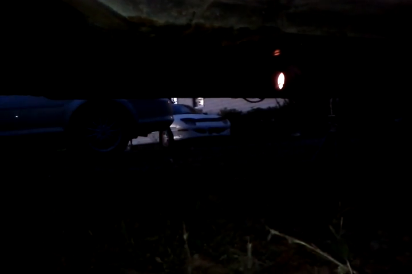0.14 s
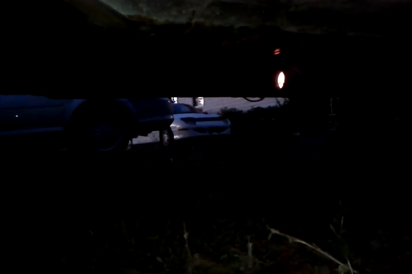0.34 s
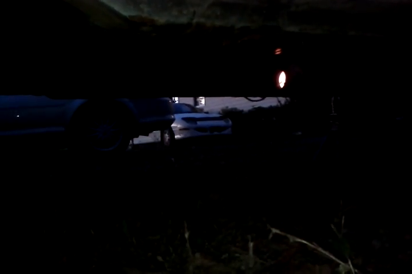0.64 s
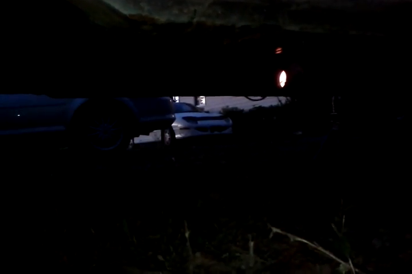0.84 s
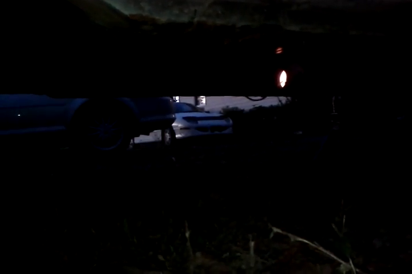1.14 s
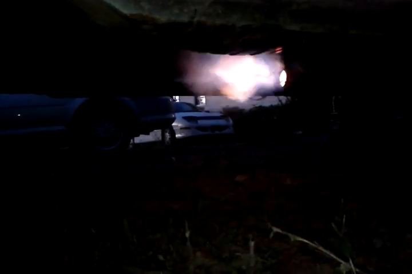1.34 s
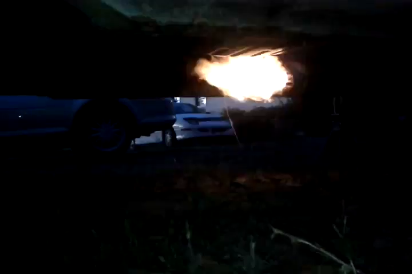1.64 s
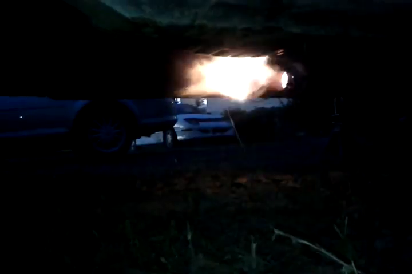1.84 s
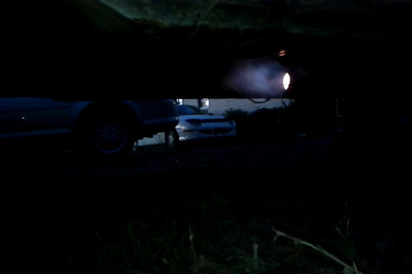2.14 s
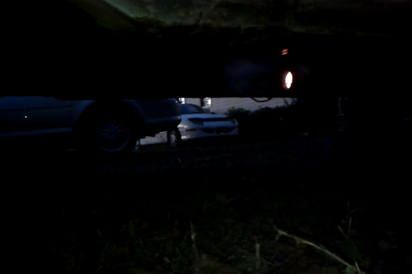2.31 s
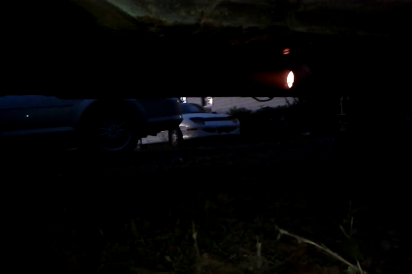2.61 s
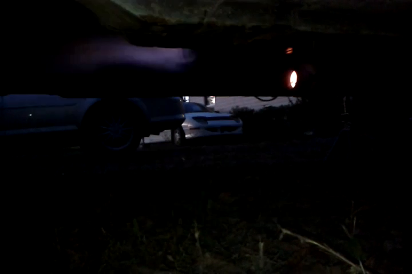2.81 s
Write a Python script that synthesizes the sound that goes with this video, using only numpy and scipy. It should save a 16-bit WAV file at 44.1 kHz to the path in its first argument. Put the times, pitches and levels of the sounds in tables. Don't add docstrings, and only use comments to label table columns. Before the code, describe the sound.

Loud car exhaust close up: loping idle, then a harsh climbing roar with sharp flame crackles.

```python
import sys
import numpy as np
from scipy import signal
from scipy.io import wavfile
from scipy.ndimage import uniform_filter1d

SR = 44100
rng = np.random.default_rng(int(sys.argv[2]) if len(sys.argv) > 2 else 0)


def store_wav(level_fs):
    pcm = np.round(np.clip(np.atleast_2d(level_fs), -1, 1) * 32767)
    wavfile.write(sys.argv[1], SR, pcm.T.astype(np.int16))


def amplitude_ratio(level_db):
    exponent = np.asarray(level_db, float) / 20
    return 10 ** exponent


N = 130977

# t/s, firing rate f/Hz
FIRING_RATE = [(0, 73.7), (.9, 69.06), (1.17, 66.14), (1.23, 74.04), (1.44, 94.75), (1.53, 90.92),
               (1.71, 119.8), (1.89, 159), (1.97, 172), (2.01, 167.6), (2.15, 163.6), (2.35, 206.3),
               (2.565, 270.6), (2.67, 270), (2.97, 236.4)]
# t/s, throb level/dB, bank imbalance level/dB, pipe ring level/dB, gas level/dB, firing scatter/dB
THROTTLE_MIX = [(.89, 0.5, -17.5, -9, -24.5, 9), (.903, 21.5, 23.5, 12, -16.5, 3),
                (.985, 20.5, 16.5, -6, -38, 4), (.993, 10.5, 5, 3.5, -34, 1),
                (1.012, -1, 8.5, 17.5, -38.5, -3.5), (1.018, 19, 8.5, 4.5, -18, 2.5),
                (1.04, 15.5, 11.5, 4, -29.5, 0), (1.047, 8.5, 4, 13, -36.5, 7.5), (1.075, 11, 7, 4, -24, 3),
                (1.088, 22, 8.5, 6.5, -13.5, 0.5), (1.14, 15.5, 0, 11, -17, 12),
                (1.15, 17.5, 13.5, 28.5, -16.5, 3), (1.215, 12, 5, 17, -6.5, 4),
                (1.225, 24, 7, 17, -5.5, 3), (1.44, 22.5, 9, 13.5, -8, 3.5), (1.455, 13, 14, 36, -21, 13),
                (1.53, 16.5, 14.5, 8, -18.5, 6.5), (1.545, 23, 11, 15.5, -7, 4),
                (1.96, 20, 9, 17.5, -11.5, 4.5), (1.975, 14.5, 29.5, 16, -3, 2),
                (2.15, 17.5, 19, 12.5, -14.5, 8.5), (2.175, 28, 22, 7, -6, 4.5),
                (2.568, 23, 10, -6.5, -14.5, 5.5), (2.575, 25, 11, 21, 0.5, 7.5),
                (2.67, 15.5, 15, 26, -9, 9.5), (2.682, 23.5, 11.5, 16, -6.5, 2)]
# t/s, twice the firing rate level/dB, half the firing rate level/dB
UNEVEN_FIRING = [(.9, -10.5, -34.5), (1.23, -10.5, -34.5), (1.44, -5, -23), (1.55, -5, -18.5),
                 (1.7, -6, -16), (1.73, 2, -16.5), (1.775, 1.5, -22), (1.79, -3.5, -22), (1.84, -4, -22),
                 (1.87, -15, -11.5), (1.96, -15, -17.5), (2.17, -14.5, -22), (2.35, -18.5, -14),
                 (2.57, -23, -14.5), (2.68, -16, -6.5), (2.97, -17, -7)]
# multiple of the firing rate, level/dB
BANK_TONES = [
    (.5, -1),
    (1.5, 0),
    (2 / 3, -9),
    (4 / 3, -8),
]
CYLINDER_LEVELS = [0.5, -7.5, -7.5, -13, 1.5, -5.5]
# f/Hz, width/Hz, level/dB
PIPE_MODES = [(143.3, 49.4, -2), (214.3, 59.9, 2.5), (260.9, 60, -0.5), (320.5, 88, -1), (448.6, 82, -4)]
# multiple of the six-firing cycle, level/dB
IDLE_ORDERS = [(12, -1), (15.01, -17.5), (15.96, -11), (17.964, 0), (20.2, -10.5), (21, 0), (22, -8),
               (23.05, -5.5), (23.88, -5), (27, -6), (25.92, -6), (30.05, -6.5), (33.35, -7.5),
               (36.07, -6.5)]
LOPE_TOPS = [430, 480, 340]
# t/s, level/dB, length/ms
FLAME_POPS = [(1.0491, -24.5, 1.8), (1.1486, -22.5, 1.5), (1.2407, -2, .5), (1.4843, -5, .5),
              (1.5495, 0, .5), (1.5995, 0, .5), (1.6506, 0.5, 0.67), (1.7275, 4.5, 0.51),
              (1.7664, 13, 0.52), (1.7825, 8, 0.29), (1.803, 12.5, .6), (1.8125, -3.5, 0.16),
              (1.8218, 4, .6), (1.846, 4, .9), (1.8578, 1, 1.8), (1.8755, 5.5, 0.52), (1.9143, 2, 0.58),
              (1.9189, 13.5, .7), (2.005, 1, .6), (2.016, 2, .6), (2.053, -2, .5), (2.089, 4, .6),
              (2.1724, 3, .6), (2.1804, 4, 0.98), (2.2058, 3, .6), (2.283, 3, .6), (2.361, 6, 1.9),
              (2.3804, 7, .8), (2.4347, 18.5, .6), (2.4731, 6, 0.47), (2.5018, 5, .7), (2.5261, 13, 0.51),
              (2.5777, 10.5, 2), (2.5968, 6, 1.8), (2.635, 5, .8), (2.644, 6, 0.33), (2.65, 9, 1.1),
              (2.6539, 16.5, 3.2), (2.6585, 6, 1.3), (2.67, 19.5, 2.5), (2.6815, -0.5, 0.44),
              (2.689, 12.5, 1.1), (2.6933, 4, 0.83), (2.7075, 2.5, 1.2), (2.7176, -0.5, .5),
              (2.7354, 1, 2.3), (2.7415, 5, 0.93), (2.7516, 7, .8), (2.7595, 6, .9), (2.786, 0, .5)]
# t/s, length/s, push (+ or -)
SKIPPED_FIRINGS = [(1.983, 0.012, -1.1), (2.038, 0.0085, 0.8), (2.11, .006, -0.8), (2.157, .006, 1),
                   (2.572, 0.006, 1), (2.597, 0.0075, 1), (1.962, 0.0045, 0.76), (2.618, 0.0023, 1),
                   (2.642, .003, -1)]
# from t/s, f/Hz
TOP_EDGE = [
    (0, 7430),
    (.89, 6100),
    (.98, 6900),
    (1.121, 8300),
]


def band(x, hz, width):
    return signal.lfilter(*signal.iirpeak(hz, hz / width, fs=SR), x)


def unit(x):
    return x / np.sqrt(np.mean(x ** 2))


def walk(rate):
    k = int(SR / rate)
    steps = np.repeat(rng.standard_normal(N // k + 1), k)
    return 0.79 * uniform_filter1d(uniform_filter1d(steps, k), k)[:N]


def curve(table, column):
    rows = np.array(table, float)
    return np.interp(np.arange(N) / SR, rows[:, 0], rows[:, column])


def firing_luck():
    return np.clip(rng.standard_normal(1000), -2, 1.5)


def engine():
    hz = curve(FIRING_RATE, column=1)
    throb_db, bank_db, ring_db, gas_db, scatter_db = (curve(THROTTLE_MIX, column=k) for k in range(1, 6))
    turns = np.cumsum(hz * (1 + 0.0062 * walk(30))) / SR
    throb = amplitude_ratio(throb_db) * firing_throb(turns, scatter_db)
    banks = amplitude_ratio(bank_db) * bank_imbalance(turns, scatter_db)
    ring = amplitude_ratio(ring_db) * pipe_ring(turns, hz, scatter_db)
    return idle_burble(turns) + idle_lope(turns) + throb + banks + ring + gas_hiss(gas_db)


def idle_gate():
    ends_s = .897
    return np.clip((ends_s - np.arange(N) / SR) / .008, 0, 1)


def idle_burble(turns):
    level_db, sweep = 5, .009
    burble = 0
    for n, db in IDLE_ORDERS:
        phase = 2 * np.pi * (n * turns / 6 - sweep * n ** 2)
        burble = burble + amplitude_ratio(db + 1.3 * walk(12)) * np.sin(phase + 0.49 * walk(7.5))
    return unit(burble) * amplitude_ratio(level_db) * idle_gate()


def idle_lope(turns):
    level_db, stumble_db = 15, 2.5
    start_hz, lag, scatter, edge = 170, .1, .06, 1.1
    lope, part = np.divmod(turns / 2 + 3 - lag, 1)
    lope = lope.astype(int)
    luck = rng.standard_normal((N // 100, 2))[lope].T
    top_hz = np.array(LOPE_TOPS)[lope % 3] * (1 + scatter * luck[0])
    lope_s = 2 / curve(FIRING_RATE, column=1)
    cycles = lope_s * part * (start_hz + (top_hz - start_hz) * part / 2)
    swell = np.sin(np.pi * part) ** edge * amplitude_ratio(stumble_db * luck[1])
    return swell * np.sin(2 * np.pi * cycles) * amplitude_ratio(level_db) * idle_gate()


def firing_throb(turns, scatter_db):
    half_phase_rad, third_half_db = -1.39, -1.5
    surge_db = -8
    half_order = np.sin(np.pi * turns + half_phase_rad + 0.24 * walk(60))
    third_half = amplitude_ratio(third_half_db + 3 * walk(60)) * np.sin(3 * np.pi * turns + 4.1)
    surge = unit(band(band(rng.standard_normal(N), 260, 300), 260, 300))
    uneven = half_order + third_half + amplitude_ratio(surge_db) * surge
    octave = amplitude_ratio(curve(UNEVEN_FIRING, column=1)) * np.cos(2 * 2 * np.pi * turns)
    beat = np.sin(2 * np.pi * turns) + octave + amplitude_ratio(curve(UNEVEN_FIRING, column=2)) * uneven
    strength = uniform_filter1d(amplitude_ratio(scatter_db * firing_luck()[turns.astype(int)]), size=60)
    return strength * beat


def bank_imbalance(turns, scatter_db):
    tones = 0
    for m, db in BANK_TONES:
        phase = 2 * np.pi * m * turns + 0.14 * scatter_db * walk(30)
        tones = tones + amplitude_ratio(db + 3.55 * walk(25)) * np.sin(phase)
    return tones


def pipe_ring(turns, hz, scatter_db):
    puff_s = 0.001264
    firing = turns.astype(int)
    puff_db = np.array(CYLINDER_LEVELS)[firing % 6] + scatter_db * firing_luck()[firing]
    pulses = np.diff(firing, prepend=0) * amplitude_ratio(puff_db) / np.sqrt(hz)
    puffs = np.convolve(pulses, np.hanning(int(2 * puff_s * SR) + 3))[:N]
    ring = 0
    for k, (f, width, db) in enumerate(PIPE_MODES):
        ring = ring + (-1) ** k * amplitude_ratio(db) * band(puffs, f, width)
    return unit(ring)


def gas_hiss(gas_db):
    hiss = unit(band(rng.standard_normal(N), 1740, 1280))
    return hiss * amplitude_ratio(gas_db + 3 * walk(54))


def flame_pops():
    gain_db, body_db = 16.5, 0
    t = np.arange(N) / SR
    crackle = unit(band(rng.standard_normal(N), 3450, 6000))
    crackle = crackle + amplitude_ratio(body_db) * unit(band(rng.standard_normal(N), 910, 710))
    out = np.zeros(N)
    for s, db, ms in FLAME_POPS:
        out += amplitude_ratio(db + gain_db) * np.sin(np.pi * np.clip((t - s) * 1000 / ms, 0, 1)) * crackle
    return out


def misfires():
    level_db = 31
    t = np.arange(N) / SR
    out = np.zeros(N)
    for s, length, push in SKIPPED_FIRINGS:
        out += push * amplitude_ratio(level_db) * np.sin(np.pi * np.clip((t - s) / length, 0, 1))
    return out


def scene():
    return (engine() + flame_pops() + misfires())[None]


def low_cut(x):
    cut_hz, q = 183, .6
    w = 2 * np.pi * cut_hz / SR
    a, c = np.sin(w) / 2 / q, np.cos(w)
    return signal.lfilter([(1 + c) / 2, -1 - c, (1 + c) / 2], [1 + a, -2 * c, 1 - a], x)


def top_cut(x):
    return signal.sosfilt(signal.butter(12, 8910, fs=SR, output="sos"), x)


def record(dry):
    clip, ceiling, rumble_cut_hz = .66, .74, 52
    air_hz, fuzz_db = 7270, -42
    x = low_cut(clip * np.clip(dry, -1, 1))
    x = signal.sosfiltfilt(signal.butter(2, rumble_cut_hz, "high", fs=SR, output="sos"), x)
    x = ceiling * np.tanh(x / ceiling)
    loudness = unit(uniform_filter1d(np.abs(x), size=900))
    x = x + amplitude_ratio(fuzz_db) * loudness * unit(band(rng.standard_normal(N), 3300, 5100))
    x = signal.sosfiltfilt(signal.butter(4, air_hz, fs=SR, output="sos"), x)
    out = 0
    for s, hz in TOP_EDGE:
        cut = signal.sosfiltfilt(signal.ellip(8, .1, 50, hz, fs=SR, output="sos"), x)
        fade = np.clip((np.arange(N) / SR - s) / .02 + 1, 0, 1)
        out = out + fade * (cut - out)
    return top_cut(out)


dry = scene()
out = record(dry)
store_wav(out)
```